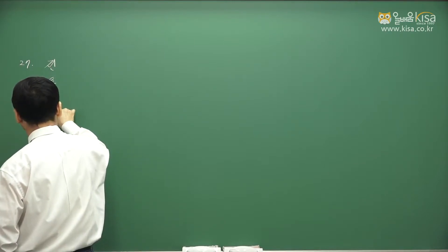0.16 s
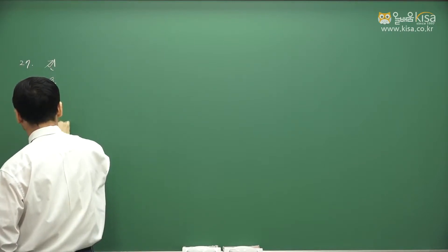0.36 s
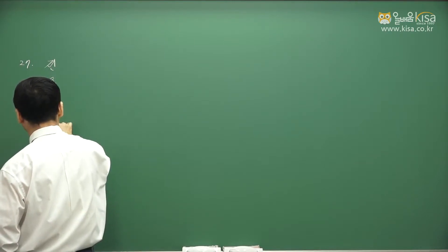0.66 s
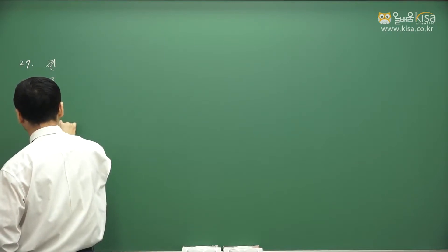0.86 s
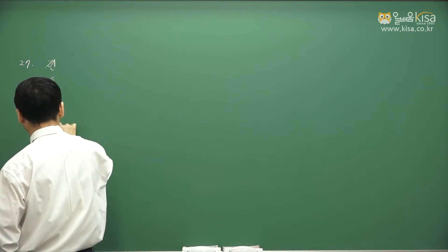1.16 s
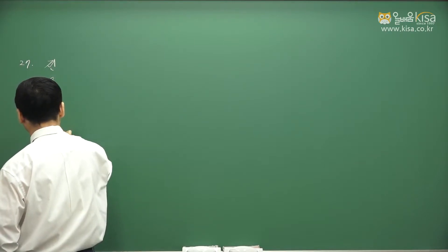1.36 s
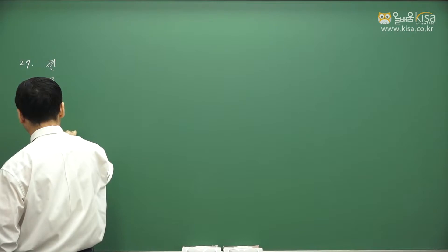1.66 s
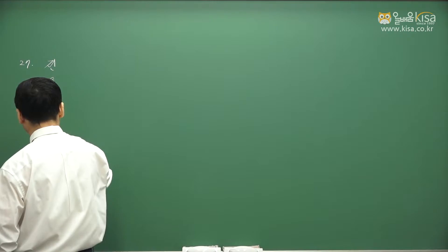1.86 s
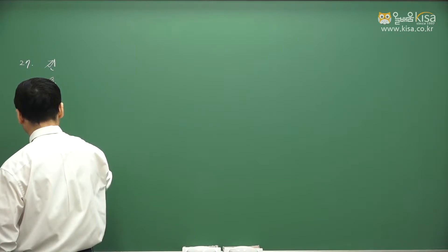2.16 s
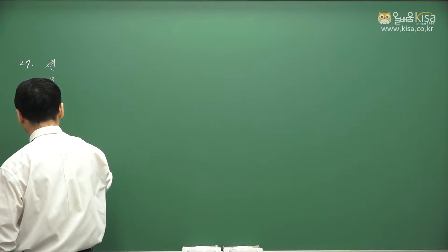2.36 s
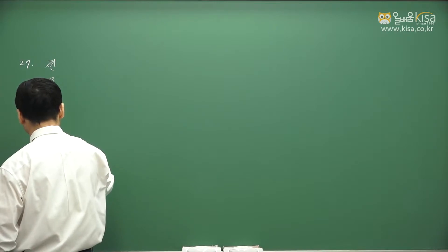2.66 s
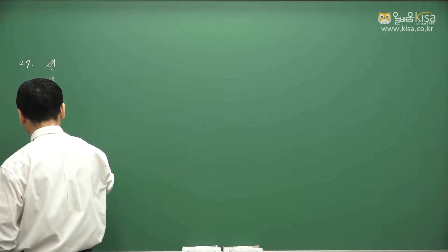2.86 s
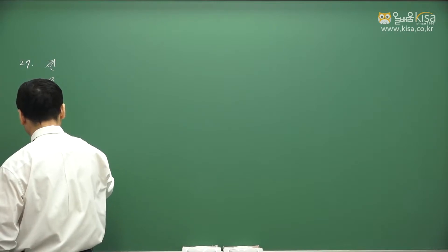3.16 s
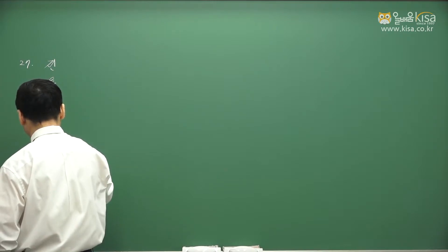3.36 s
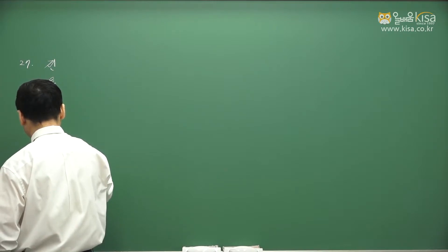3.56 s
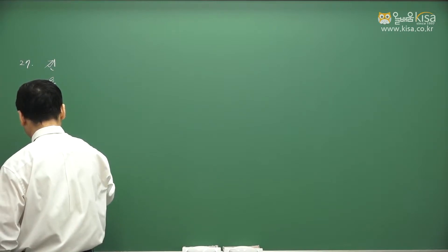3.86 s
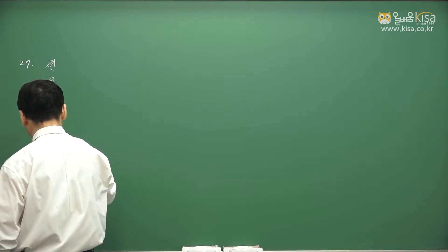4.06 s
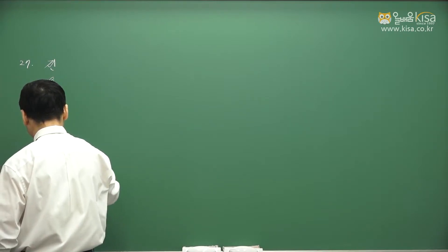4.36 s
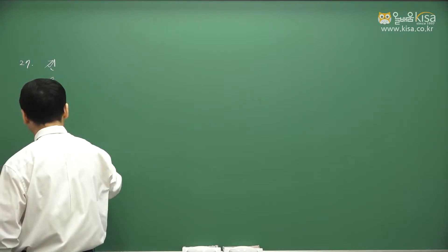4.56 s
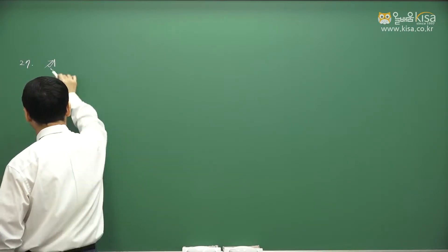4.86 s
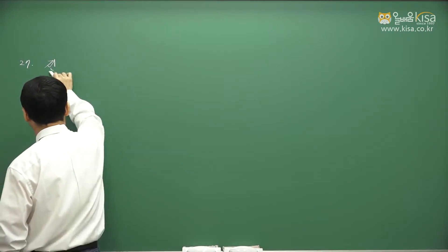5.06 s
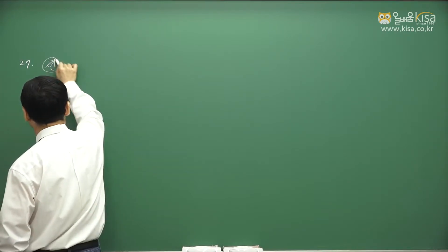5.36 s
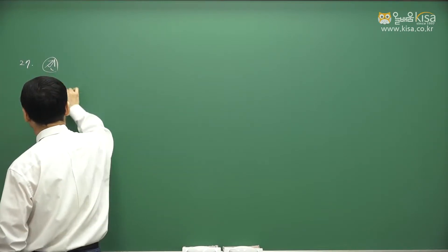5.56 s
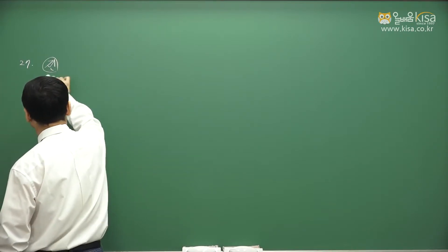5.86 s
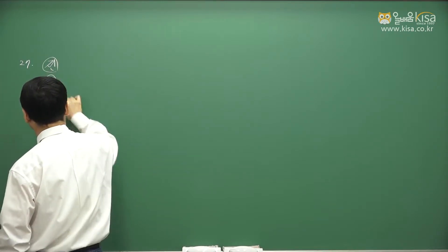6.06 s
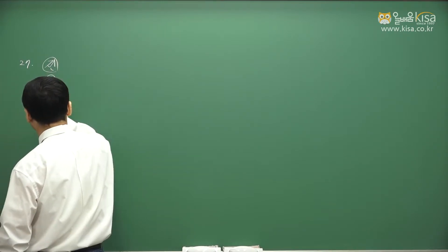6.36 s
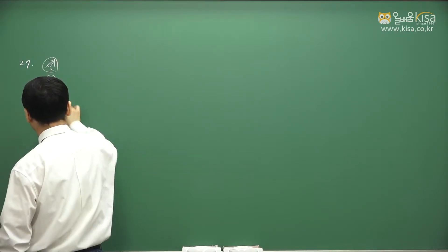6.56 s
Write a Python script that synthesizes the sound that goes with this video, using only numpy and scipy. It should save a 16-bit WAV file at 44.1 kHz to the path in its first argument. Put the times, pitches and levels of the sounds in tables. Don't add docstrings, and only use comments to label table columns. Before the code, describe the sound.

Chalk raps a classroom board in uneven hard taps with short gritty scrapes, then louder knocks and squeaky long strokes over faint ventilation hiss.

```python
import sys
import numpy as np
from scipy import signal
from scipy.fft import rfft, irfft, next_fast_len
from scipy.io import wavfile
from scipy.ndimage import uniform_filter1d

SR = 44100
rng = np.random.default_rng(int(sys.argv[2]) if len(sys.argv) > 2 else 0)


def file_out(sig):
    cols = np.atleast_2d(sig).T
    lim = np.clip(cols, -1, 1)
    pcm = np.round(lim * 32767).astype(np.int16)
    wavfile.write(sys.argv[1], SR, pcm)


def boost(x):
    u = np.asarray(x, float) / 20
    return 10 ** u


N = 296345

# (time [s], level [dB], ring [Hz], second ring [Hz], hardness [dB/octave])
TAPS = [(0.521, -15, 2390, 3320, -2.5), (0.791, -17, 2380, 3300, -6.5), (1.261, -13.5, 2230, 3300, -0.5),
        (1.477, -18, 2300, 3240, -7), (2.0497, -14.5, 1770, 2500, 4.5), (2.5192, -15.5, 2380, 3520, 0),
        (2.7929, -16, 1380, 2370, -4.5), (3.374, -13.5, 1710, 2900, -0.3), (3.7568, -15, 1210, 2180, -4.5),
        (4.175, -13, 1230, 3380, -4), (4.5003, -8.5, 1180, 3100, 4), (4.99, -9, 1210, 2420, 10.5),
        (5.6155, -10, 2510, 2920, 9), (6.2238, -21.5, 1530, 2180, -3.5)]
# (time [s], scrape level [dB], lowest squeak, rising with speed [Hz])
SWEEPS = [
    [(5.01, -46, 1300), (5.05, -51, 1350), (5.2, -37.5, 1420), (5.3, -36.5, 1800), (5.325, -43.5, 1700),
     (5.335, -34.5, 2130), (5.478, -36, 2610), (5.494, -60, 2650), (5.53, -51, 2650)],
    [(5.635, -39.5, 1200), (5.7, -48.5, 1170), (5.767, -40, 1250), (5.843, -40, 1370), (5.933, -34.5, 2300),
     (6.013, -43.5, 2500), (6.051, -43, 2530), (6.065, -73, 2500), (6.1, -51, 2520)],
    [(6.24, -39, 1200), (6.294, -47, 1200), (6.33, -41.5, 1240), (6.43, -40.5, 1550), (6.55, -38.5, 2500),
     (6.6, -42, 2900), (6.632, -32.5, 3050), (6.648, -70, 3000), (6.72, -56, 3000)],
]
# (frequency [Hz], t60 [s])
ROOM = [(300, 0.95), (900, 0.4), (2000, 0.26), (4000, 0.13), (9000, 0.029)]
SWEEPS_START_S = SWEEPS[0][0][0]


def along(points, hz):
    f, v = np.transpose(points)
    return np.interp(np.log(hz + 1), np.log(f + 1), v)


def unit(x):
    return x / np.sqrt(np.mean(x ** 2) + 1e-20)


def curves(tables, t, quiet):
    s, *cols = np.transpose(np.vstack(tables))
    out = [np.interp(t, s, c) for c in cols]
    inside = sum((t > rows[0][0]) & (t < rows[-1][0]) for rows in tables)
    return [np.where(inside > 0, out[0], quiet)] + out[1:]


def coloured(x, gain):
    m = next_fast_len(len(x) + 8192)
    return irfft(rfft(x, m) * gain(np.fft.rfftfreq(m, 1 / SR)), m)[:len(x)]


def coloured_noise(points):
    return unit(coloured(rng.standard_normal(N), lambda hz: boost(along(points, hz))))


def causal(gain, size):
    ceps = irfft(np.log(gain(np.fft.rfftfreq(size, 1 / SR)) + 1e-6), size)
    ceps[1:size // 2] *= 2
    ceps[size // 2 + 1:] = 0
    return irfft(np.exp(rfft(ceps)), size)


def bump(hz, centre_hz, width_hz):
    return 1 / (1 + (2 * (hz - centre_hz) / width_hz) ** 2)


def rings(hz, one_hz, two_hz, width_hz, strength):
    return np.sqrt(1 + strength * (bump(hz, one_hz, width_hz) + bump(hz, two_hz, width_hz)))


def dying(t60s, length, delay_s):
    hz, t, z = signal.stft(rng.standard_normal(length), SR, nperseg=128)
    z = z * boost(-60 * t / along(t60s, hz)[:, None])
    tail = signal.istft(z, SR, nperseg=128)[1][:length]
    tail = tail * np.clip(np.arange(length) / SR / delay_s, 0, 1)
    return tail / np.linalg.norm(tail)


def tap_blow(db, one_hz, two_hz, hard_db, weight_db):
    # (frequency [Hz], level [dB])
    blow_colour = [(88, -45), (150, -24.5), (618, -3.5), (1050, -0.5), (1530, -3.5), (3100, -0.5),
                   (3770, -6), (4420, -5.5), (5480, -14.5), (6680, -13.5), (7220, -15), (14700, -47),
                   (16500, -106)]
    t = np.arange(SR // 30) / SR

    def dull(hz):
        return 1 / (1 + (hz / 5500) ** 3)

    def smooth(hz):
        tilt_db = hard_db * np.log2(1 + hz / 3000) + weight_db * np.log2(1 + 1300 / (hz + 400))
        return boost(along(blow_colour, hz) + tilt_db)

    chatter = rng.standard_normal(len(t)) * boost(-60 * np.clip(t - 0.0045, 0, 1) / 0.016)
    chatter[0] = 3
    lumps = np.sqrt(uniform_filter1d(np.abs(rfft(chatter, 1024)) ** 2, size=9))
    even = (lumps.mean() / lumps) ** 0.27

    def low_gain(hz):
        return smooth(hz) * rings(hz, one_hz, two_hz, 125, 5) * dull(hz) * even

    blow = np.convolve(chatter, causal(low_gain, size=1024))
    spikes = rng.standard_normal(len(t)) * boost(2.5 * rng.exponential(size=len(t)))
    fade = boost(-60 * np.clip(t - 0.0025, 0, 1) / 0.02) + boost(-17 - 60 * t / 0.09)
    crack = unit(spikes) * fade * boost(0.5)
    blow += np.convolve(crack, causal(lambda hz: smooth(hz) * (1 - dull(hz)), size=1024))
    return blow * boost(db - 0.54) / np.sqrt(np.mean(blow[:350] ** 2))


def tap_ring(db, low_hz, high_hz):
    # (frequency [Hz], level [dB])
    ring_colour = [(120, -49), (200, -21), (748, -5), (1090, -5.5), (1540, -7.5), (2160, -3), (3260, -4.5),
                   (4920, -19), (12000, -28), (15600, -68), (22000, -120)]
    # (frequency [Hz], t60 [s])
    board_decay = [(300, 0.12), (1000, 0.32), (3000, 0.029), (8000, 0.062)]

    def gain(hz):
        bright = boost(along(ring_colour, hz) + 0.9 * np.log2(hz / 1500 + 0.2))
        return bright * rings(hz, low_hz, high_hz, 160, 2.5)

    ring = boost(3.5) * dying(board_decay, SR // 2, 0.0084) + dying(ROOM, SR // 2, 0.012)
    tail = signal.fftconvolve(causal(gain, size=2048), ring)
    return tail * boost(db - 0.53) / np.sqrt(np.mean(tail[530:2650] ** 2))


def taps():
    # (ring level [dB], mode [Hz], second mode [Hz], weight [dB/octave])
    board_rings = [(-29.5, 1080, 1740, -1), (-33, 1070, 2140, -8), (-29.5, 980, 1780, -3.5),
                   (-32.5, 1050, 2050, -13), (-27.5, 890, 1700, 2), (-25.5, 1000, 1780, -3),
                   (-29, 1050, 1300, -2.5), (-26.5, 1050, 1760, -0.5), (-27.5, 1010, 1350, -4),
                   (-27, 1020, 2080, -10.5), (-23, 1020, 1980, -3), (-25, 1400, 1720, 15),
                   (-26.5, 1300, 1800, 8.5), (-34, 770, 1550, 3.5)]
    out = np.zeros(N + SR)
    for (s, db, one_hz, two_hz, hard_db), (ring_db, low_hz, high_hz, weight_db) in zip(TAPS, board_rings):
        blow = tap_blow(db, one_hz, two_hz, hard_db, weight_db)
        tail = tap_ring(ring_db, low_hz, high_hz)
        start = round(s * SR)
        out[start:][:len(blow)] += blow
        out[start:][:len(tail)] += tail
    return out[:N]


def grit(density_hz, spread_db):
    spikes = (rng.random(N) * SR < density_hz) * rng.standard_normal(N)
    return unit(spikes * boost(spread_db * rng.exponential(size=N)))


def pressure(t):
    # (peak time [s], rise [s], fall [s], scrape level [dB], singing, <0 glancing [1])
    small_strokes = [(.114, 0.03, 0.074, -53, 1.21), (.632, 0.096, 0.021, -49.5, 0.56),
                     (.86, 0.059, 0.057, -46.5, 0.96), (.968, 0.028, 0.11, -50, 1.1),
                     (1.1, 0.041, 0.056, -50, 1.4), (1.33, 0.054, .02, -51, 0.51),
                     (1.576, 0.1, 0.061, -46, 0.71), (2.118, 0.058, 0.066, -46, -0.033),
                     (2.25, 0.07, 0.085, -47.5, 0.78), (2.6, 0.083, 0.12, -43.5, 0.47),
                     (3.054, 0.091, 0.11, -55, 0.49), (3.524, .04, 0.08, -54.5, -.2),
                     (3.618, 0.066, 0.013, -52, .5), (3.85, 0.11, .09, -48.5, -1.4),
                     (3.356, .003, .004, -48, 0.8), (3.41, 0.017, .07, -49.5, -0.51),
                     (4.266, .04, 0.05, -49, -0.34), (4.382, 0.063, 0.0085, -51.5, 0.0094)]
    sweep_db, squeak_hz = curves(SWEEPS, t, -120)
    sweep_body_db = 12 - 9 * np.log2(squeak_hz / 1400)
    parts = [(boost(sweep_db), sweep_body_db, 0)]
    for s, db, *_ in TAPS:
        if s < SWEEPS_START_S - 0.1:
            skid = (t > s + 0.015) * boost(db - 34.5 - 239 * np.abs(t - s - 0.02))
            parts.append((skid, 2, 0.2))
    for s, rise_s, fall_s, db, share in small_strokes:
        far = np.where(t < s, (s - t) / rise_s, (t - s) / fall_s)
        parts.append((boost(db - 17 * np.minimum(far, 3) ** 2), 9.5, share))
    power = sum(g ** 2 for g, _, _ in parts)
    body_db = sum(g ** 2 * b for g, b, _ in parts) / power
    share = sum(g ** 2 * a for g, _, a in parts) / power
    return np.sqrt(power), body_db, share, squeak_hz


def stick_modes(t, small, share, squeak_hz, streaks):
    # (frequency [Hz], level over the scrape [dB], level in first loose grip [dB])
    short_modes = [(2300, 13.5, 7), (2900, 12, 3), (3300, 8, 12), (4100, -22, 5), (4500, 3, -3),
                   (5300, 7.5, -3), (6500, 0, 2), (7300, 4, 7)]
    # (frequency [Hz], level [dB])
    sweep_modes = [(2600, 2), (3350, 2), (3700, 2), (4500, 3), (4970, 2), (6300, 1), (6800, 0), (10200, 2),
                   (11350, 3)]
    regrip_s, firm_hz = 0.4, 3100
    bands = []
    for c, db, loose_db in short_modes:
        grip_db = np.where(t < regrip_s, loose_db, db)
        bands.append((c, grip_db * np.maximum(share, 0) ** (1 + (c > firm_hz)) - 120 * ~small))
    bands += [(c, db - 120 * small) for c, db in sweep_modes]
    flicker_db = -0.5 * unit(uniform_filter1d(streaks[::-1], size=20, axis=1))
    bands = [(c, db + flicker_db[k * 9]) for k, (c, db) in enumerate(bands)]
    bands.append((squeak_hz, 5.5 + 0.8 * flicker_db[-9] - 120 * small))
    return bands


def strokes():
    # (frequency [Hz], level [dB])
    dust_colour = [(500, -28), (1000, -15), (2000, -4), (3500, -3), (5000, -3), (7000, -4), (8500, -9),
                   (11000, -12.5), (13000, -17), (16000, -21)]
    frame, overlap = 512, 384
    hz, t, z = signal.stft(grit(density_hz=26000, spread_db=-1.0), SR, nperseg=frame, noverlap=overlap)
    small = t < SWEEPS_START_S
    gain, body_db, share, squeak_hz = pressure(t)

    streaks = uniform_filter1d(rng.standard_normal(z.shape), size=2, axis=0)
    streaks = uniform_filter1d(streaks, size=28, axis=1)
    depth_db = np.outer(1 - 0.3 * (hz > 7000), np.where(small, 1.8, 3.7))
    bright_db = np.where(small, 2 - 4 * np.minimum(share, 0), 0.1)
    shape_db = along(dust_colour, hz)[:, None] + depth_db * unit(streaks)
    shape_db = shape_db + np.outer(bump(hz, 1200, 2100), body_db)
    shape_db = shape_db + np.outer(np.log2(hz / 6000 + 0.5), bright_db)
    shape_db = shape_db + 1.8 * ~small * unit(uniform_filter1d(streaks[:, ::-1], size=10, axis=0))

    bands = stick_modes(t, small, share, squeak_hz, streaks)
    sing = 1 + sum(boost(2 * db) * bump(hz[:, None], c, 210 + 0.025 * c) ** 2 for c, db in bands)
    shape = boost(shape_db) * np.sqrt(sing)
    shape /= np.sqrt((shape[(hz > 4500) & (hz < 12000)] ** 2).sum(0) / len(hz))
    sound = signal.istft(z * shape, SR, nperseg=frame, noverlap=overlap)[1][:N]
    fine = np.arange(0, N / SR, 0.001)
    level = boost(-2.2) * np.interp(np.arange(N) / SR, fine, pressure(fine)[0])
    return uniform_filter1d(level, 150) * sound


def lifts():
    # (time [s], peak level [dB], ring [Hz], length [s])
    lift_offs = [
        (1.141, -36.5, 1330, 0.0061),
        (1.789, -42, 700, 0.008),
        (4.381, -38.5, 2040, 0.0064),
        (5.469, -24, 1530, 0.0072),
        (6.045, -23.5, 1630, 0.005),
        (6.635, -29, 990, 0.0065),
    ]
    out, t = np.zeros(N + SR), np.arange(SR // 8) / SR
    for s, db, ring_hz, length_s in lift_offs:
        def colour(hz):
            return np.sqrt(bump(hz, ring_hz, 450) + 0.033 * bump(hz, 1200, 4100)) * hz / (hz + 600)

        burst = rng.standard_normal(len(t)) * (t / length_s) * np.exp(1 - t / length_s)
        burst = coloured(burst, colour)
        out[round((s - length_s) * SR):][:len(t)] += boost(db) * burst / np.abs(burst).max()
    return out[:N]


def shirt():
    # (time [s], thump level [dB], rub level [dB], half length [s])
    jolts = [(0.545, -47, -77, 0.029), (0.81, -53, -74, 0.036), (1.27, -49, -77, 0.023),
             (1.603, -51, -60, 0.043), (2.074, -47, -65, 0.016), (2.561, -34.5, -48, 0.018),
             (2.654, -42, -44, .025), (2.834, -55, -54, 0.046), (3.156, -59, -66, 0.044),
             (3.397, -60, -53, 0.07), (3.772, -47, -52, 0.023), (4.21, -54, -63, 0.047),
             (4.528, -43, -46, 0.033), (4.92, -48.5, -55, 0.095), (5.062, -33.5, -49.5, 0.039),
             (5.292, -52, -43, 0.015), (5.466, -39.5, -45, 0.049), (5.612, -34, -45, .02),
             (5.842, -37, -50, 0.016), (6.047, -46, -42, 0.025), (6.17, -44, -50, 0.022),
             (6.642, -39, -44.5, .03), (6.7, -51, -56, 0.016)]
    # (time [s], level [dB])
    sleeve = [(4.58, -48), (4.626, -47), (4.706, -49.5), (4.762, -44.5), (4.776, -48), (4.828, -44),
              (4.975, -48)]
    # (frequency [Hz], level [dB])
    cloth_colour = [(290, -8), (500, -6), (766, -18), (2020, -15.5), (2530, -15.5), (2920, -18.5),
                    (7260, -20), (15000, -42)]
    rest_thump_db, rest_rub_db = -55, -54
    time = np.arange(N) / SR
    fine = np.arange(0, N / SR, 0.002)
    s, thump_db, rub_db, half_s = np.transpose(jolts)
    swell = np.exp(-np.abs(fine[:, None] - s) / half_s)
    thump_gain = np.interp(time, fine, boost(rest_thump_db) + swell @ boost(thump_db))
    rub_gain = np.interp(time, fine, boost(rest_rub_db) + swell @ boost(rub_db))
    rustle_gain = uniform_filter1d(boost(curves([sleeve], time, -120)[0] - 1.0), 600)
    thump = coloured_noise([(15, -9.5), (35, -6.0), (60, -7), (110, -12.5), (200, -113)])
    rub = coloured_noise([(70, -20.5), (120, -7.5), (300, -15.5), (500, -38.5)])
    return thump_gain * thump + rub_gain * rub + rustle_gain * coloured_noise(cloth_colour)


def air():
    # (frequency [Hz], level [dB])
    air_colour = [(65, -32), (110, -18), (345, -8), (407, -3), (443, -3.5), (630, -9), (744, -9.5),
                  (898, -10.5), (1100, -11), (1540, -14), (8300, -24.5), (12800, -30), (15800, -42)]
    # (frequency [Hz], level [dB rms])
    whine_tones = [(12447, -74)]
    time = np.arange(N) / SR
    hiss = unit(coloured(rng.standard_normal(N), lambda hz: boost(along(air_colour, hz)) * (hz > 200)))
    whine = sum(np.sqrt(2) * boost(db) * np.sin(2 * np.pi * hz * time) for hz, db in whine_tones)
    return boost(-52.5) * hiss + whine


def scene():
    near = strokes() + lifts()
    room = signal.fftconvolve(near, dying(ROOM, SR // 2, 0.00077))[:N]
    steady = coloured(near + boost(-12) * room + shirt() + air(), lambda hz: hz < 15900)
    return (taps() + steady)[None]


def dropouts(dry):
    # (start [s], end [s], smear level [dB])
    blanks = [
        (4.4905, 4.4965, -34),
        (4.9795, 4.987, -32),
        (5.6055, 5.6122, -32),
    ]
    # (start [s], end [s])
    dips = [
        (3.746, 3.753),
        (6.209, 6.219),
    ]
    time = np.arange(N) / SR
    is_open = 1.0 - sum((time > a) & (time < b) for a, b, _ in blanks)
    smear = sum(boost(db) * ((time > b) & (time < b + 0.0035)) * (time - b) / 0.002 for _, b, db in blanks)
    fuzz = coloured_noise([(300, -20), (1500, 0), (5000, -2), (15000, -13), (16500, -60)])
    dip = uniform_filter1d(1.0 * sum((time > a) & (time < b) for a, b in dips), size=60)
    near_dip = uniform_filter1d(dip, size=200)
    treble = coloured(dry[0] * near_dip / (near_dip + 0.05), lambda hz: 1 / (1 + (1000 / (hz + 1)) ** 6))
    return (dry - 0.85 * dip * treble) * uniform_filter1d(is_open, 30) + smear * fuzz


def low_pass(x):
    return signal.sosfilt(signal.butter(12, 16820, fs=SR, output="sos"), x)


def record(dry):
    x = dropouts(dry)
    x = x / (1 + np.abs(x / 1.05) ** 6) ** (1 / 6)
    x = coloured(x[0], lambda hz: hz < 16700)[None]
    return low_pass(x)


dry = scene()
out = record(dry)
file_out(out)
```